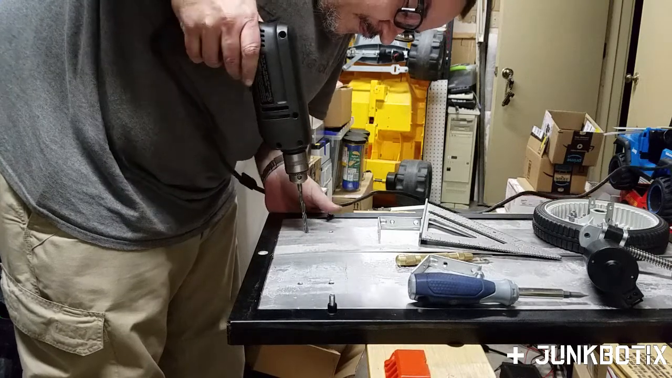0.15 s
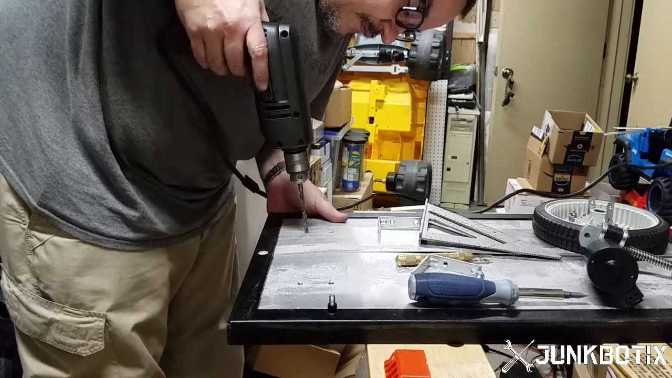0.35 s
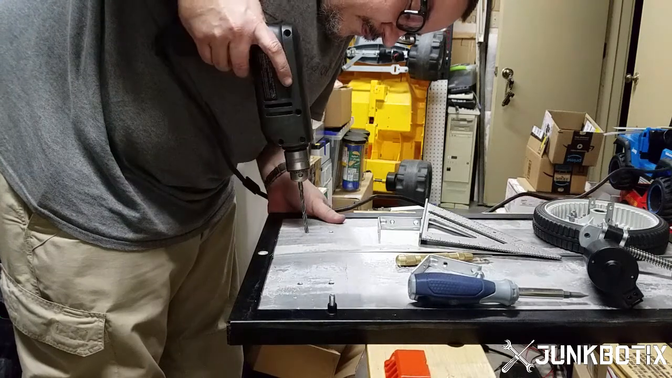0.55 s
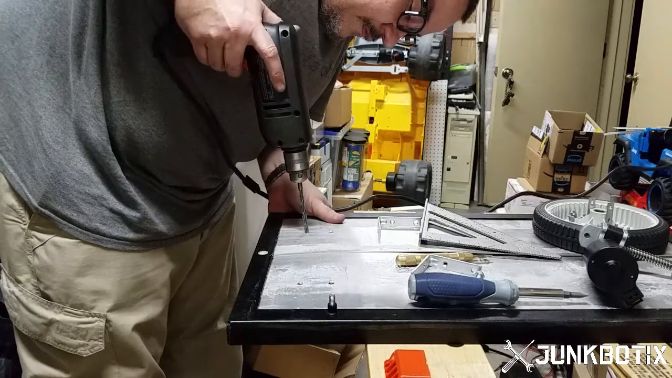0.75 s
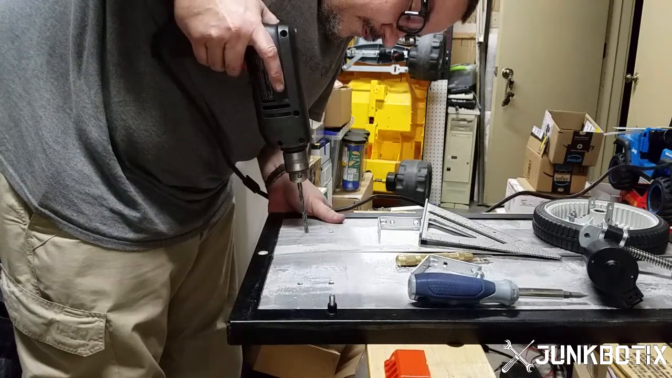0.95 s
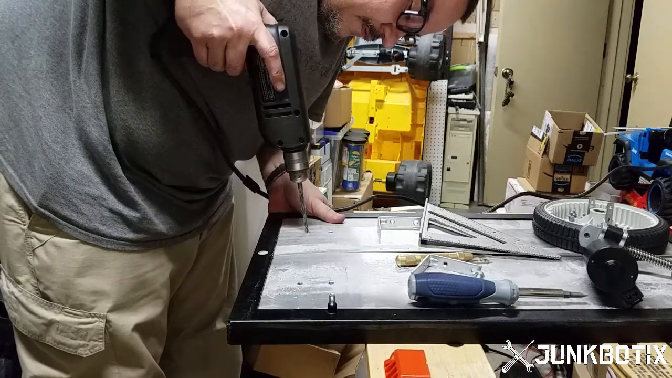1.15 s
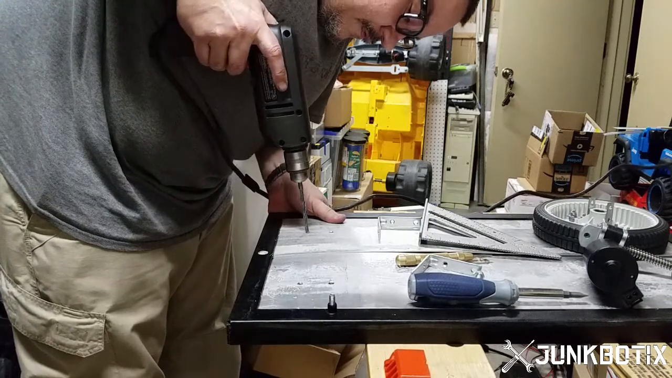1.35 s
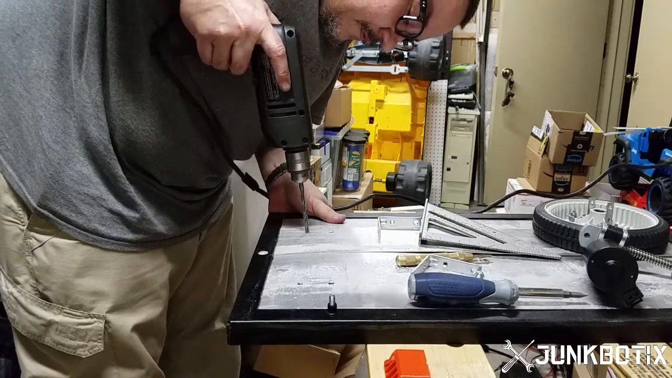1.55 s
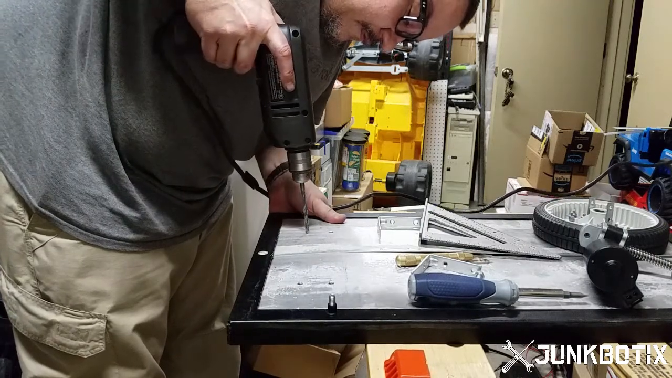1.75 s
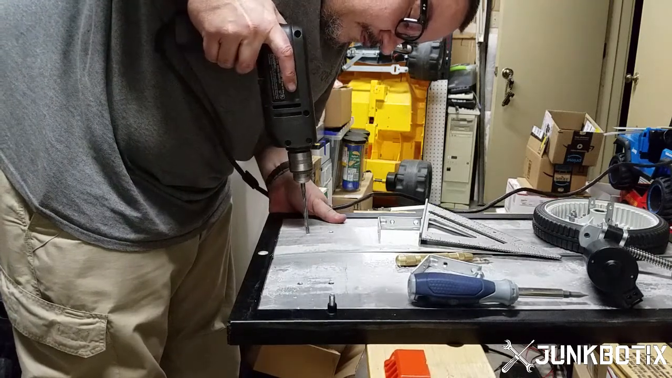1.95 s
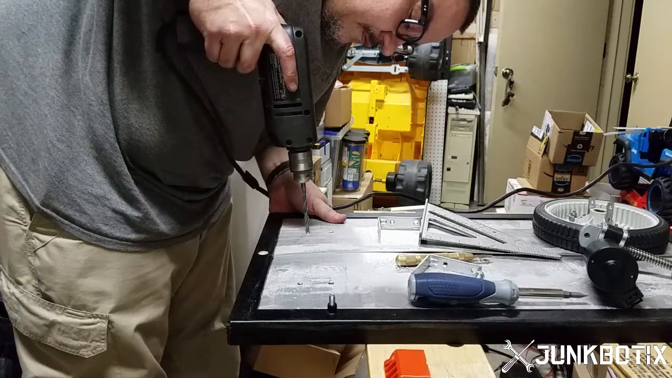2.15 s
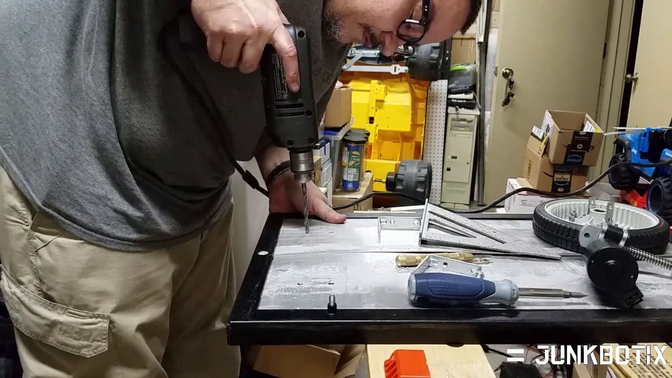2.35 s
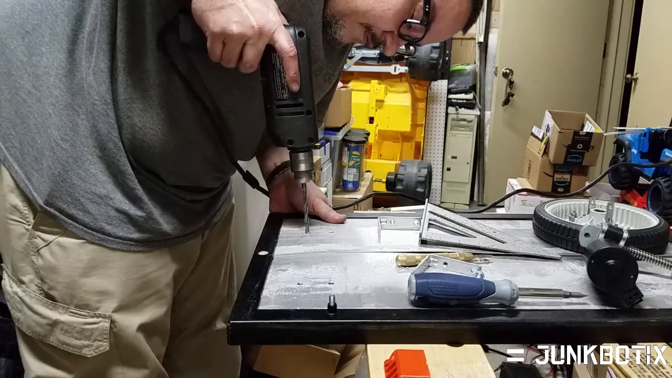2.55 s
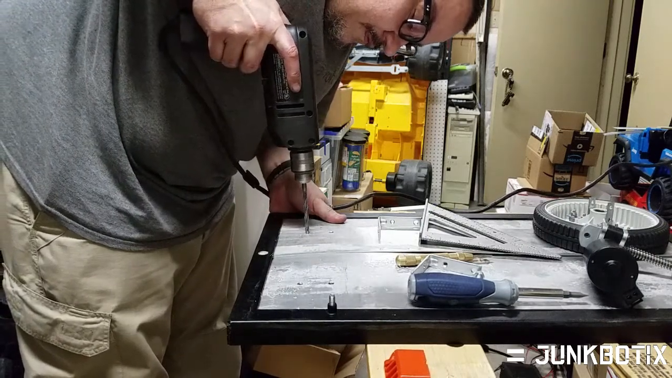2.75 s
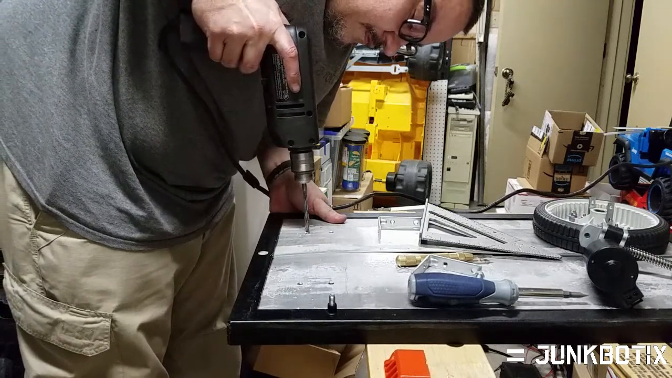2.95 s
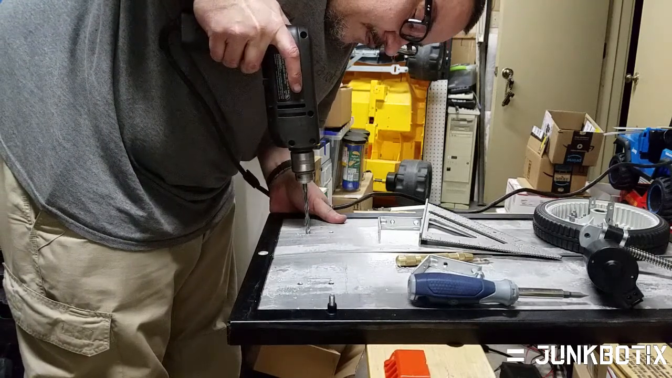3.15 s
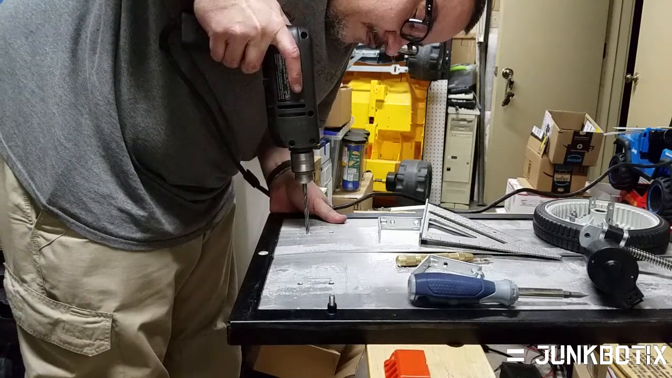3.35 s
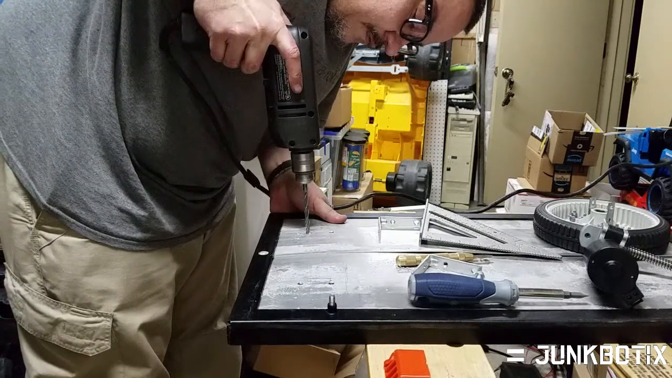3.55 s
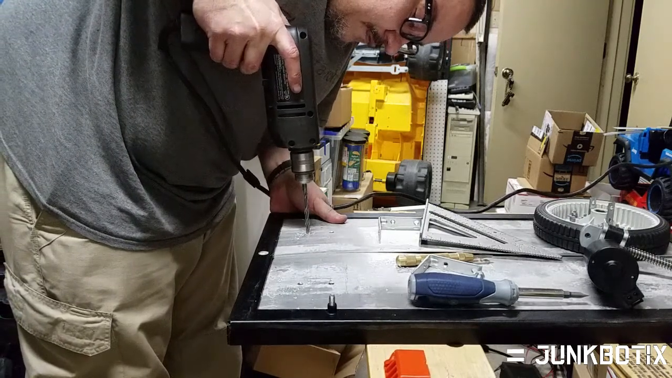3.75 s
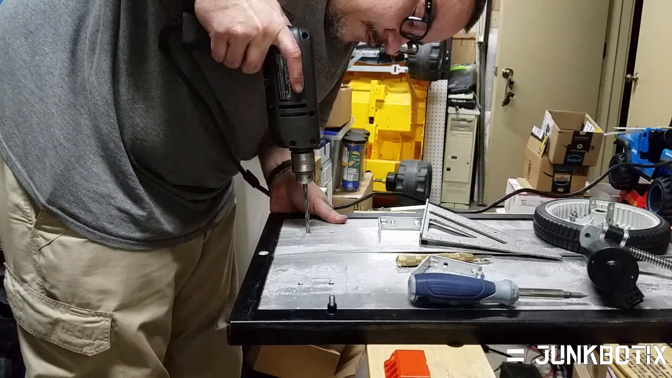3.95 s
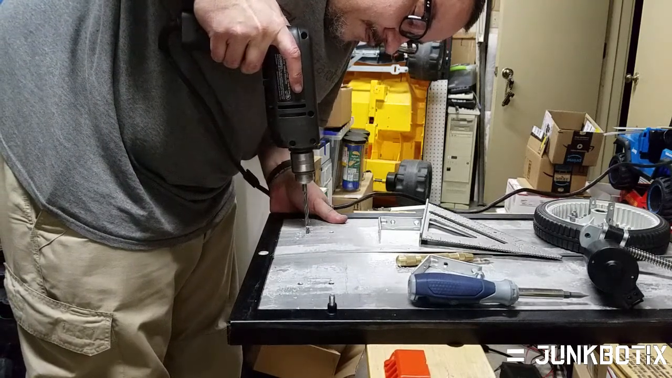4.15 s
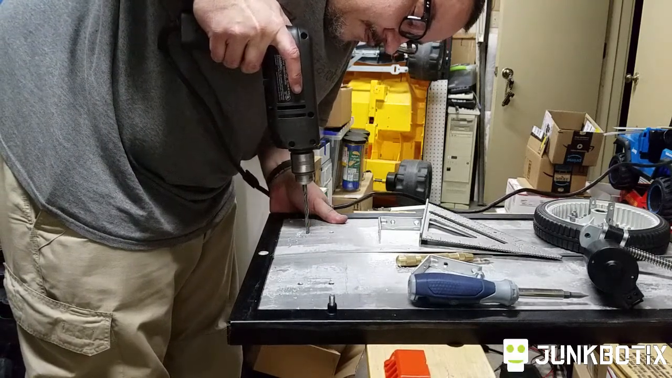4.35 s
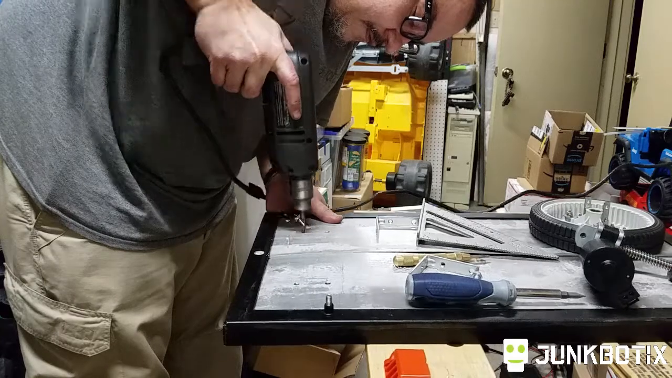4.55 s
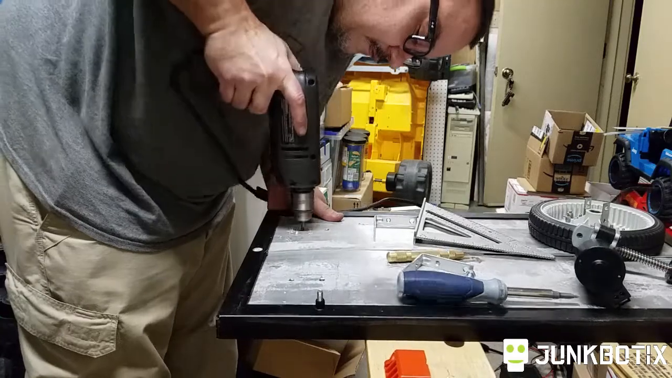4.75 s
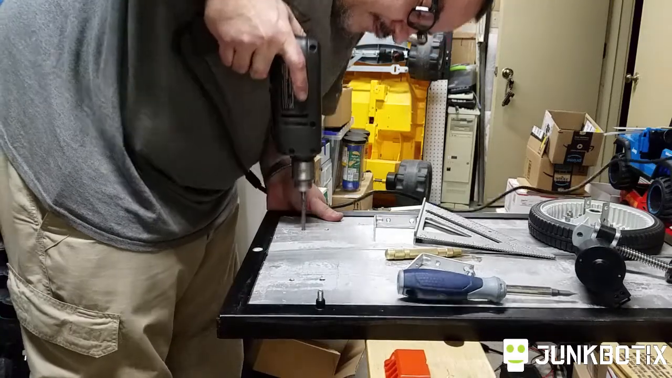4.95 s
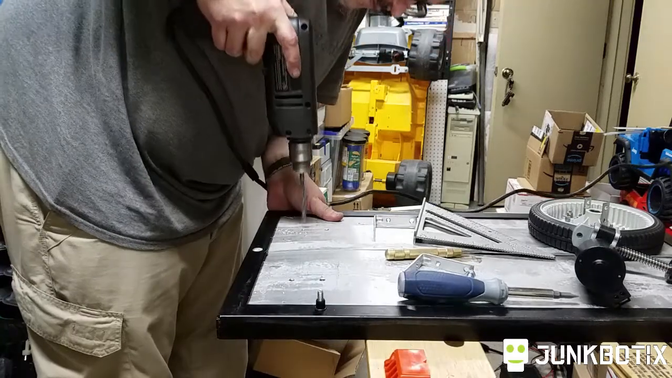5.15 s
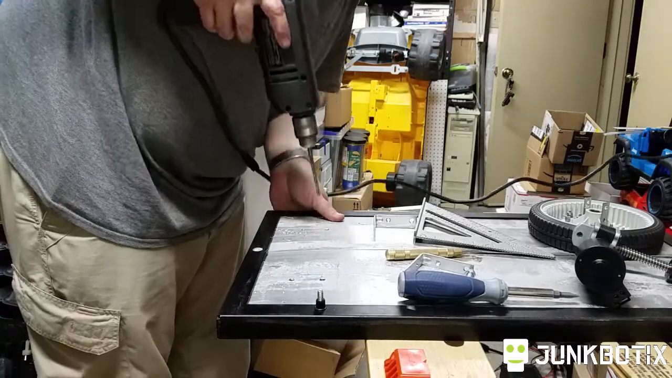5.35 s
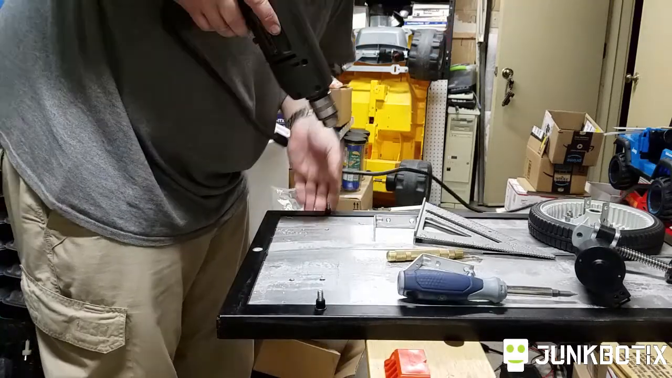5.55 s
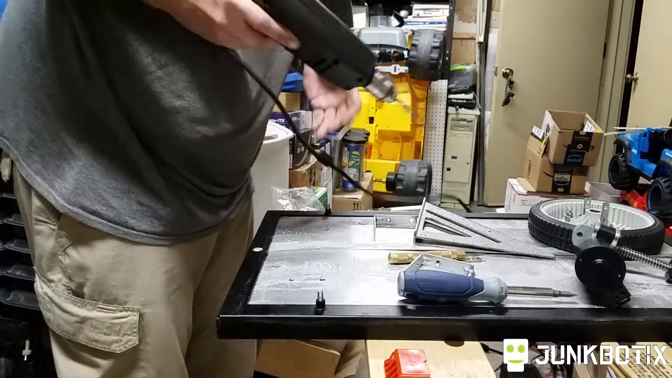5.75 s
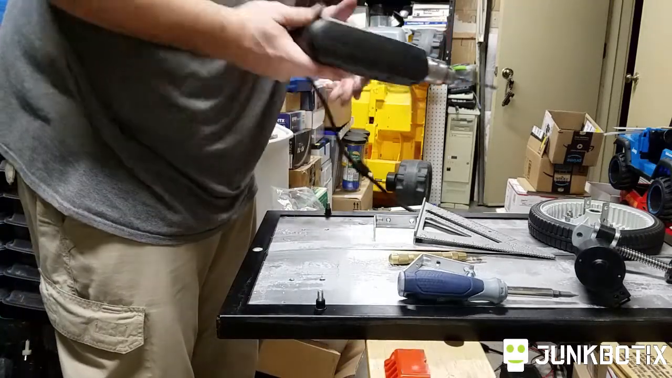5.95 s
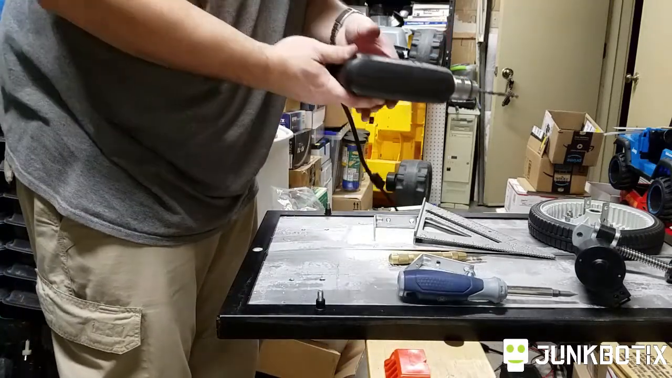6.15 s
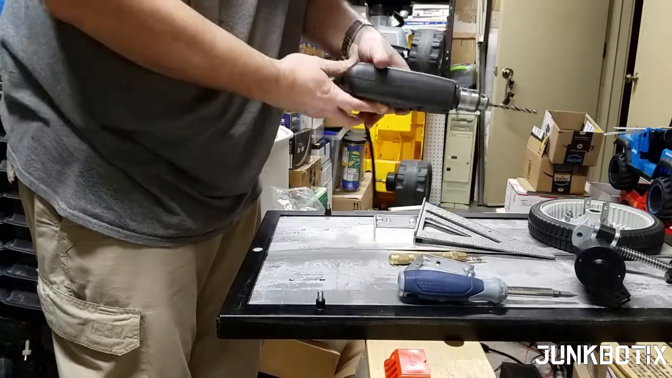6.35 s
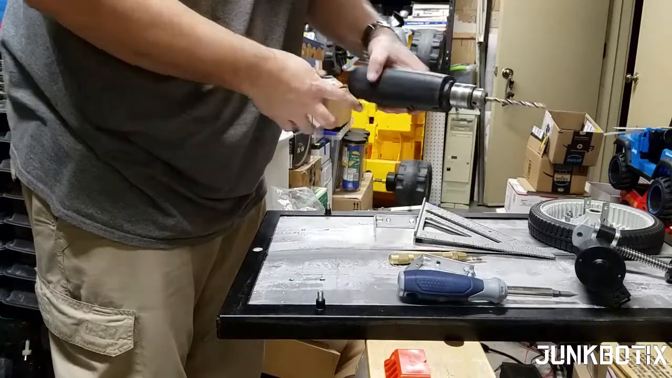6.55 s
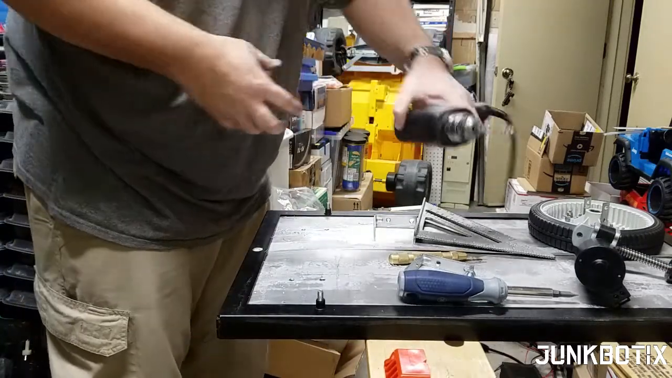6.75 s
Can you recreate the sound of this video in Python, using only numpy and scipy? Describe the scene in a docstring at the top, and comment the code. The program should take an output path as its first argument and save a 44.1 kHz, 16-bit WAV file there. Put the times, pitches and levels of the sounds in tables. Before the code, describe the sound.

After a few light clicks of a bit on metal, a corded electric drill spins up with a rattling whine. Its pitch sinks and roughens as it bites into an aluminium sheet, and the bit squeals in the hole. It breaks through with a thump, the sheet clatters against the racing tool, and the motor winds down. A hand scrapes faintly along the case, all heard close by in a small workshop.

```python
"""In a small workshop, hands shift on a corded drill and its bit clicks on an aluminium sheet.
At 1 s the motor spins up: brushes and teeth rattle the housing, the rotor hums, the pinion whines.
The bit bites, and the whine sinks and roughens; from 3.7 s the bit sticks and squeals in the hole.
At 4.5 s it breaks through with a thump, and the sheet clatters against the racing tool.
From 5 s the motor coasts down, a dry bearing sings and a hand scrapes along the case."""
import sys
import numpy as np
from scipy import signal
from scipy.fft import rfft, irfft
from scipy.io import wavfile
from scipy.ndimage import uniform_filter1d

SR = 44100
rng = np.random.default_rng(int(sys.argv[2]) if len(sys.argv) > 2 else 0)


def dump_mix(stems):
    """Bounce the given channels to the path in sys.argv[1] as a 16-bit WAV at rate SR."""
    frames = np.atleast_2d(stems).T  # one column per channel
    limited = np.clip(frames, -1, 1)  # hard clip at full scale
    pcm = np.round(limited * 32767).astype(np.int16)
    wavfile.write(sys.argv[1], SR, pcm)


N = 299439
T = np.arange(N) / SR
FREQ = np.maximum(np.arange(N + 1) * SR / (2 * N), 1)
BREAKTHROUGH_S, TRIGGER_OFF_S = 4.503, 5.03
PINION_TEETH, COMMUTATOR_BARS = 7, 24
RATTLE_KNEE_HZ = 266.5  # the speed above which the rattle stops growing louder


# The motor under power. Each row: time in seconds, turns a second.
DRIVEN_SPEED = [(0.96, 5), (1.1, 125), (1.27, 202), (1.5, 256), (1.7, 276), (1.95, 282), (2.26, 272.5),
                (2.98, 234.7), (3.28, 210.5), (3.55, 178.5), (3.97, 155), (4.16, 144), (4.27, 202),
                (4.35, 234), (4.45, 258.6), (4.51, 259.5), (4.8, 365), (5.03, 380)]

def motor_speed(drag_s=1.25, friction_hz_per_s=24):
    """Turns a second: driven until the trigger is let go, then slowed by air drag and friction."""
    kept = np.exp(-np.maximum(T - TRIGGER_OFF_S, 0) / drag_s)
    speed = curve(DRIVEN_SPEED) * kept - friction_hz_per_s * drag_s * (1 - kept)
    return np.maximum(speed, 0) * (T >= DRIVEN_SPEED[0][0])


# Pressure on the bit. Each row: time in seconds, load from 0 to 1.
PRESSURE = [(1.95, 0.05), (2.6, 0.06), (3.25, 0.17), (3.6, 0.93), (4.15, 1), (4.3, 0.5), (4.48, 0.08),
            (4.58, 0.08)]

def bit_load():
    """How hard the bit leans into the metal; zero outside the cut."""
    return curve(PRESSURE) * during(PRESSURE)


# The whine going into the gear case. Each row: multiple of the tooth rate, free dB, cutting dB.
WHINE_HARMONICS = [(1, -32, -35.5), (2, -41, -30), (3, -37.5, -28), (4, -46, -32), (5, -47, -34.5),
                   (6, -48, -36), (7, -49, -37.5), (8, -49, -36.5), (9, -52, -41), (10, -54, -42),
                   (11, -55, -43), (12, -55, -45)]
# The case rings as harmonics sweep through it. Each row: centre in Hz, width in Hz, gain in dB.
GEAR_CASE_MODES = [(1047, 210, 9), (1215, 130, -9.5), (1876, 55, 2.5), (3040, 290, 9.5), (3620, 140, 6),
                   (4170, 660, 5), (5100, 480, 5), (6520, 350, 8), (7250, 280, 8), (10200, 3400, -5.5),
                   (13500, 3400, 13)]

def gear_whine(turns, speed, load, bite_load=.11):
    """Pinion teeth mesh, harder once the bit bites; cutting jerks them and smears the high harmonics."""
    jerk = (.13 + .38 * np.sqrt(load)) * walk(105) + (.04 + .07 * load) * walk(300)
    mesh = 2 * np.pi * PINION_TEETH * turns + jerk
    bite = np.clip(load / bite_load, 0, 1)
    free_speed_db = 90 * np.minimum(decades(speed) - .03, 0)
    cut_speed_db = 13 * decades(speed)
    whine = 0
    for k, free_db, cut_db in WHINE_HARMONICS:
        flicker_db = 2.6 * np.tanh(walk(80))
        db = (free_db + free_speed_db) * (1 - bite) + (cut_db + cut_speed_db) * bite + flicker_db
        whine += undb(db) * np.sin(k * mesh + rng.uniform(0, 2 * np.pi))
    # the flutes grab and let go, so all harmonics stutter together
    stutter = undb((2 + 1.2 * load) * np.tanh(walk(70)))
    duck = undb(-14 * ramp(BREAKTHROUGH_S, .07))
    return np.sqrt(2) * shape(whine * stutter * duck, undb(resonances(GEAR_CASE_MODES)))


# The rattle's overall EQ. Each row: frequency in Hz, gain in dB.
RATTLE_EQ = [(53, -41), (90, -21.5), (192, -22), (271, -13.5), (309, -15), (476, -7.5), (591, -7.5),
             (1040, -7), (1700, -6.5), (1900, -4.5), (3330, -4.5), (4220, -5), (10300, -4), (11900, -2.5),
             (15800, 0)]
# The housing's resonances. Each row: centre in Hz, width in Hz, gain in dB.
HOUSING_MODES = [(480, 90, 3), (700, 90, 3), (1070, 140, 4), (2200, 450, 3.5), (3000, 300, 1.5),
                 (3650, 200, -5), (4250, 500, 4), (6700, 500, 1.5), (10000, 1500, -2), (11700, 350, 3)]
# Brief swells and dips in the mids and hiss. Each row: time in seconds, half width in seconds, dB.
RATTLE_SWELLS = [(4.615, 0.013, -4), (4.675, 0.012, 6), (4.9, .2, 2), (6.69, 0.017, -9)]
# One fader per band. Each lists, in dB: level at the knee speed, rise per tenfold speed up to the knee,
# then the change at full load, after the breakthrough, when coasting and when lifted.
BODY_FADER = (-34.5, 32.5, 0.5, 1, -0.5, -2)
MID_FADER = (-24.5, 36.5, 7, -2, -9.5, 6.5)
HISS_FADER = (-23.5, 46, 6.5, -4, -9.5, 10.5)

def housing_rattle(turns, speed, load):
    """Brushes tick over the commutator and loose teeth knock; with the fan's air they ring the housing."""
    brushes = impacts(COMMUTATOR_BARS * turns, scatter_db=6)
    backlash = impacts(PINION_TEETH * turns + .3 * walk(300), scatter_db=6.5)
    force = noise() + undb(-2) * brushes + undb(-1.5) * backlash
    force *= undb(1.44 * np.sin(2 * np.pi * turns) + 1.02 * walk(55))  # swells once a turn, and flutters
    rattle = colour(force, RATTLE_EQ, HOUSING_MODES)
    hiss = unit(band(rattle, 7950, 17900)) * fader(HISS_FADER, speed, load)
    mids = unit(band(rattle, 2260, 6870)) * fader(MID_FADER, speed, load)
    # the unloaded bearings growl in a narrow band until the breakthrough
    growl = unit(band(band(rattle, 2170, 2400), 2170, 2400))
    growl *= undb(-11.5 - 19 * load) * (1 - ramp(BREAKTHROUGH_S, .13))
    body = (unit(band(rattle, 60, 1550)) + growl) * fader(BODY_FADER, speed, load)
    swell_db = sum(db * np.exp(-((T - s) / width) ** 2) for s, width, db in RATTLE_SWELLS)
    return (hiss + mids) * undb(swell_db) + body


def fader(settings, speed, load):
    """Gain of one rattle band, riding the speed, the load and the stages of the job."""
    db, speed_db, load_db, through_db, coast_db, lift_db = settings
    db += speed_db * np.minimum(decades(speed), 0) + load_db * load
    db += through_db * ramp(BREAKTHROUGH_S, .16)
    db += coast_db * ramp(5.105, .016)  # the gears go slack
    db += lift_db * ramp(5.27, .65)  # the drill is lifted and its vents turn to the listener
    return undb(db)


# The balance of the rotor's tones. Each row: multiple of the shaft rate, driven dB, coasting dB.
ROTOR_HARMONICS = [(3, -17, -8), (4, -18, -2), (6, -7, -20), (8, 0, -17), (9, -10, -14), (10, -10, -14),
                   (11, -9, -10), (12, -8, -22), (13, -10, -25), (15, -4, -30), (20, -9, -30),
                   (22, -9, -30)]

def rotor_tones(turns, speed, load):
    """Slots and fan blades sound multiples of the shaft rate that flare in the housing's resonances."""
    coasting = ramp(TRIGGER_OFF_S, .075)
    tones = 0
    for k, driven_db, coast_db in ROTOR_HARMONICS:
        db = driven_db + (coast_db - driven_db) * coasting + 4 * walk(9)
        tones += undb(db) * np.sin(2 * np.pi * k * turns + .5 * walk(30))
    tones = shape(tones, undb(2.3 * resonances(HOUSING_MODES)))
    tones = band(tones, 500, 9000)  # the small housing radiates little bass
    gain = fader(BODY_FADER, speed, load) * undb(-12 - 2.8 * load + .83 * coasting)
    return np.sqrt(2) * tones * gain


def rotor_hum(turns, speed):
    """Unbalance hums at the shaft rate, more quietly while the hole steadies the bit."""
    steadied = ramp(2.36, .19) * (1 - ramp(BREAKTHROUGH_S, .15))
    db = -49 + 74 * decades(speed) - 21 * steadied + walk(28)
    return np.sqrt(2) * np.sin(2 * np.pi * turns) * undb(db)


# The tool batters the sheet in bouts. Each row: start in seconds, hold in seconds, level in dB.
CLATTER_BOUTS = [(4.515, 0.044, -23.5), (4.62, 0.18, -28), (4.805, 0.1, -21), (4.96, 0.077, -29),
                 (5.075, 0.038, -28.5)]
# The sheet's EQ. Each row: frequency in Hz, gain in dB.
SHEET_EQ = [(26, -68), (45, -16), (183, -14), (224, -14), (268, -13.5), (408, -7), (587, -11.5),
            (704, -1.5), (877, -2.5), (2180, -9), (3500, -23), (4550, -31), (7700, -120)]
# Its resonances. Each row: centre in Hz, width in Hz, gain in dB.
SHEET_MODES = [(234, 21, 10.5), (334.5, 37, 12), (425, 27, 7.5), (584, 41, -3), (693, 120, 4),
               (1000, 150, 0), (1310, 90, 3)]

def sheet_clatter(turns, load):
    """The sheet drums faintly under the cut; after the breakthrough the flutes and chuck batter it."""
    blows = impacts(.6 * turns + .4 * walk(60), scatter_db=4) + undb(2.5) * noise()
    ring = unit(band(colour(blows, SHEET_EQ, SHEET_MODES), 93, 6000))
    envelope = bouts(CLATTER_BOUTS, attack_s=.027, fall_db_per_s=135) + undb(-44.5) * load
    drum = unit(band(blows, 85, 180)) * undb(-56.5) * load
    return ring * envelope + drum


# The sheet's low notes. Each row: pitch in Hz, seconds to fall 60 dB, starting level in dB.
THUMP_MODES = [(135, 0.61, -39), (226, 0.31, -32), (390, 0.22, -27)]

def breakthrough_thump():
    """The tool drops through the hole and thumps the sheet."""
    return band(sum(damped_tone(BREAKTHROUGH_S, *mode) for mode in THUMP_MODES), 140, 2000)


# Falling squeals. Each row: start and end in seconds, first and last pitch in Hz, level in dB.
SQUEAL_GLIDES = [(3.74, 4.12, 2280, 2180, -27.5), (4.2, 4.32, 2210, 2170, -32),
                 (4.645, 4.715, 2250, 2200, -21.5)]
# Their timbre. Each row: harmonic number, relative level in dB.
SQUEAL_HARMONICS = [(1, -16), (2, -5), (3, 0), (4, -8), (5, -9), (6, -8)]

def bit_squeals():
    """The bit sticks and slips against the wall of the hole at its own twisting resonance."""
    sound = np.zeros(N)
    for start, end, start_hz, end_hz, db in SQUEAL_GLIDES:
        glide = [(start, start_hz), (end, end_hz)]
        phase = 2 * np.pi * np.cumsum(curve(glide)) / SR + .55 * walk(80)
        tone = sum(undb(part_db) * np.sin(k * phase) for k, part_db in SQUEAL_HARMONICS)
        sound += unit(tone * undb(2 * walk(60))) * undb(db) * during(glide)
    return sound


# The bearing's thin note. Each row: time in seconds, pitch in Hz, level in dB.
BEARING_NOTE = [(5.45, 2422, -62), (5.54, 2390, -41), (5.7, 2300, -39), (5.87, 2140, -42),
                (6.04, 2400, -43), (6.13, 2350, -70)]

def dry_bearing():
    """A dry bearing sings a wavering tone as the motor slows."""
    phase = 2 * np.pi * np.cumsum(curve(BEARING_NOTE)) / SR + 2 * walk(70)
    db = curve(BEARING_NOTE, axis=2) + 2.7 * walk(60)
    return np.sqrt(2) * np.sin(phase) * undb(db) * during(BEARING_NOTE)


# Bit and trigger clicks. Each row: start in seconds, strength in dB, treble offset in dB.
CLICK_HITS = [(0.223, -44, -15), (0.323, -37.5, -20), (0.442, -29.5, -26), (0.58, -32.5, -17),
              (0.716, -58, -22), (0.896, -49, -29), (0.96, -52, -46), (0.977, -35.5, -23),
              (0.995, -36.5, -2), (6.714, -47, -19)]
# Their EQ. Each row: frequency in Hz, gain in dB.
CLICK_EQ = [(120, -65), (200, -40), (412, -35), (494, -3), (696, 1), (1780, -0.5), (4640, -16.5),
            (4980, -16), (7830, -21), (15000, -31)]

def clicks():
    """The bit taps the sheet and the trigger clicks: each a bright tick over a short ring."""
    ring_envelope, tick_envelope = np.zeros(N), np.zeros(N)
    for start, db, treble_db in CLICK_HITS:
        age = np.maximum(T - start, 0)
        ring_envelope += (T >= start) * undb(db - 11.5 - 60 * age / .11)
        tick_envelope += (T >= start) * undb(db + treble_db - 60 * age / .034)
    ring = unit(band(colour(noise(), CLICK_EQ), 200, 6900))
    tick = unit(band(colour(noise(), CLICK_EQ), 6000, 16000))
    return ring * ring_envelope + tick * tick_envelope


# Strokes along the case. Each row: start in seconds, hold in seconds, level in dB.
SCRAPE_STROKES = [(6.02, .15, -42.5), (6.24, 0.16, -41), (6.53, 0.053, -39.5), (6.74, .05, -47)]

def hand_scrape():
    """Skin drags over the ribbed plastic case in fine grains."""
    grains = noise() * undb(6.2 * np.tanh(walk(150)))
    return unit(band(grains, 3900, 4500)) * bouts(SCRAPE_STROKES, attack_s=.05, fall_db_per_s=220)


def bench_knock():
    """One soft knock on the bench just before the motor starts."""
    return damped_tone(start=.803, hz=420, t60=.11, db=-50)


# Small moves on the grip. Each row: start in seconds, hold in seconds, level in dB.
RUSTLE_MOVES = [(.07, 0.081, -63), (.25, 0.043, -71), (.37, 0.05, -64.5), (.66, .04, -72)]
# Their EQ. Each row: frequency in Hz, gain in dB.
RUSTLE_EQ = [(290, -45), (500, -5), (1030, -1), (3950, -13), (4760, -10), (5750, -15.5), (15800, -20)]

def grip_rustle():
    """Hands and sleeves rub on the grip in faint, uneven puffs."""
    envelope = bouts(RUSTLE_MOVES, attack_s=.056, fall_db_per_s=130)
    return unit(colour(noise(), RUSTLE_EQ)) * envelope * undb(2.6 * walk(39))


# The room tone's EQ. Each row: frequency in Hz, gain in dB.
AIR_EQ = [(12, -36), (20, -18), (32, -6.5), (93, -4), (187, -19.5), (365, -10), (586, -25), (693, -14),
          (1560, -25), (2180, -22), (3700, -33.5), (10100, -43), (15800, -34)]

def room_tone():
    """The still air of the workshop, a low steady bed."""
    return unit(colour(noise(), AIR_EQ)) * undb(-63)


def workshop_reverb(x, t60=.29, wet_db=-7):
    """Dense short reflections from the bench and cluttered walls."""
    tail = noise() * undb(-60 * np.minimum(T / t60, 2)) * (T > .003)
    wet = signal.fftconvolve(x, tail / np.sqrt(np.sum(tail ** 2)))[:N]
    return (x + undb(wet_db) * wet) / np.sqrt(1 + undb(wet_db) ** 2)


def undb(db):
    """Decibels to gain."""
    return 10 ** (np.asarray(db) / 20)


def unit(x):
    """Scale to an rms of one."""
    return x / np.sqrt(np.mean(x ** 2))


def decades(speed):
    """Speed in powers of ten relative to the rattle's knee."""
    return np.log10(np.maximum(speed, 1e-3) / RATTLE_KNEE_HZ)


def curve(rows, axis=1):
    """One column of a table, joined by straight lines in time."""
    rows = np.array(rows)
    return np.interp(T, rows[:, 0], rows[:, axis])


def during(rows):
    """One while a table lasts, with 10 ms fades on either side."""
    return np.clip(np.minimum(T - rows[0][0], rows[-1][0] - T) / .01 + 1, 0, 1)


def ramp(start, length):
    """Rise from zero to one and stay there."""
    return np.clip((T - start) / length, 0, 1)


def bouts(rows, attack_s, fall_db_per_s):
    """Envelope of events that each fade in up to their start, hold and die away."""
    power = 0
    for start, hold, db in rows:
        fall_db = fall_db_per_s * np.maximum(T - start - hold, 0)
        power += (ramp(start - attack_s, attack_s) * undb(db - fall_db)) ** 2
    return np.sqrt(power)


def noise():
    """White noise."""
    return rng.standard_normal(N)


def walk(rate):
    """Smooth random drift with an rms of one, changing at up to the given rate in Hz."""
    steps = np.interp(T * 2 * rate, np.arange(8192), rng.standard_normal(8192))
    return unit(uniform_filter1d(steps, max(int(SR / rate / 4), 1)))


def impacts(count, scatter_db):
    """A blow of random size each time the running count passes a whole number."""
    strikes = np.diff(np.floor(count), prepend=0) > 0
    sizes = undb(scatter_db * np.clip(noise(), -2, 2)) * np.sign(noise())
    return unit(strikes * sizes / np.sqrt(np.abs(np.gradient(count)) + 1e-4))


def damped_tone(start, hz, t60, db):
    """One struck mode, falling 60 dB in t60 seconds."""
    age = np.maximum(T - start, 0)
    return undb(db - 60 * age / t60) * np.sin(2 * np.pi * hz * age)


def shape(x, gain):
    """Filter by a gain for each frequency."""
    return irfft(rfft(x, 2 * N) * gain)[:N]


def band(x, lo_hz, hi_hz):
    """Keep one band, with fairly steep edges."""
    return shape(x, 1 / np.sqrt((1 + (lo_hz / FREQ) ** 8) * (1 + (FREQ / hi_hz) ** 8)))


def resonances(modes):
    """Gain in dB that a set of peaks and dips adds at each frequency."""
    return sum(db / (1 + (2 * (FREQ - hz) / width) ** 2) for hz, width, db in modes)


def colour(x, eq, modes=()):
    """Minimum-phase filter: a smooth EQ curve with resonances on top."""
    hz, db = np.transpose(eq)
    gain_db = np.interp(np.log(FREQ), np.log(hz), db) + resonances(modes)
    cepstrum = irfft(np.log(undb(gain_db)))
    causal = 2 * cepstrum[:N] * np.where(T > 0, 1, .5)
    return shape(x, np.exp(rfft(causal, 2 * N)))


def scene():
    """One shaft drives the drill; sheet, hands and room join it in the same mix on both channels."""
    speed, load = motor_speed(), bit_load()
    turns = np.cumsum(speed) / SR
    drill = housing_rattle(turns, speed, load) + rotor_tones(turns, speed, load)
    drill += rotor_hum(turns, speed) + dry_bearing() + gear_whine(turns, speed, load)
    metal = sheet_clatter(turns, load) + breakthrough_thump() + bit_squeals()
    handling = clicks() + bench_knock() + grip_rustle() + hand_scrape()
    sound = workshop_reverb(drill + metal + handling) + room_tone()
    return np.array([sound, sound])


def record(dry, top_hz=15700):
    """A steep low-pass takes off the very top."""
    return signal.sosfilt(signal.ellip(12, .1, 90, top_hz, fs=SR, output="sos"), dry)


dry = scene()
out = record(dry)
dump_mix(out)
```